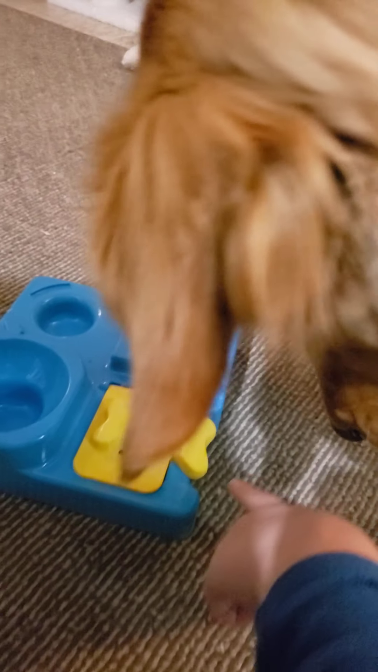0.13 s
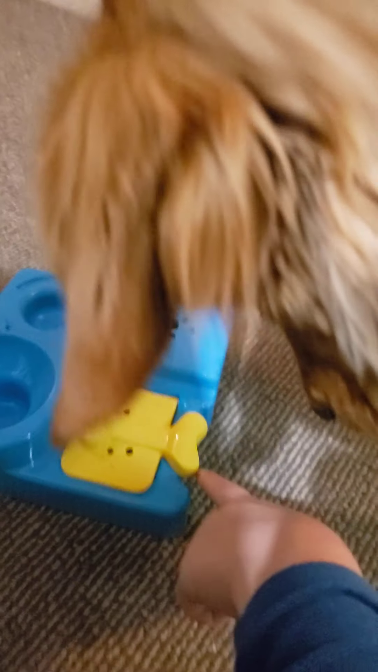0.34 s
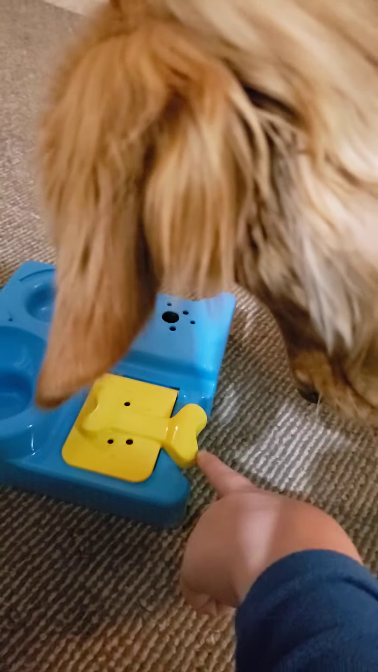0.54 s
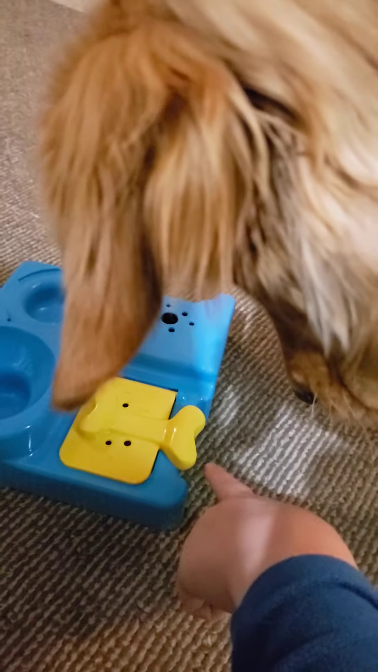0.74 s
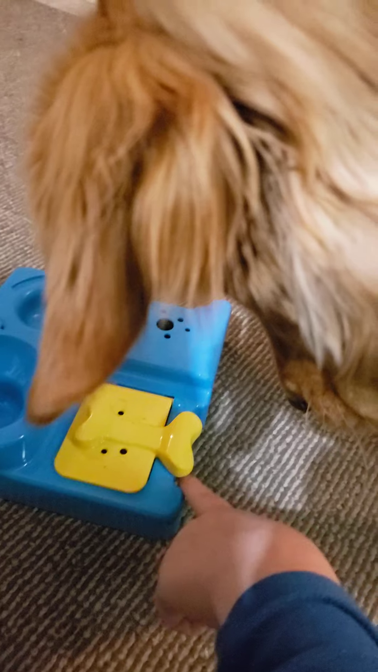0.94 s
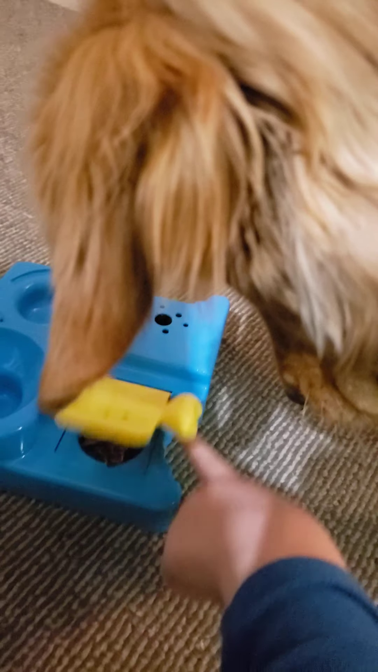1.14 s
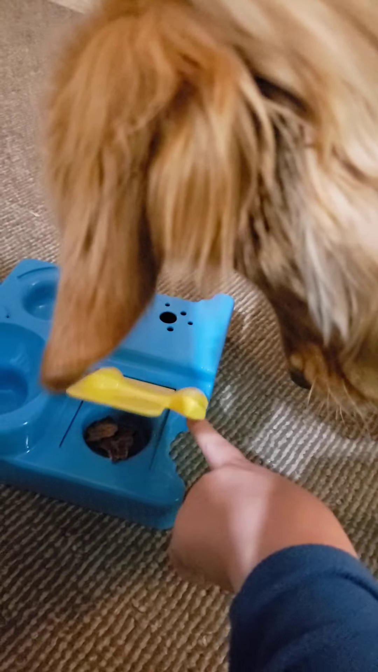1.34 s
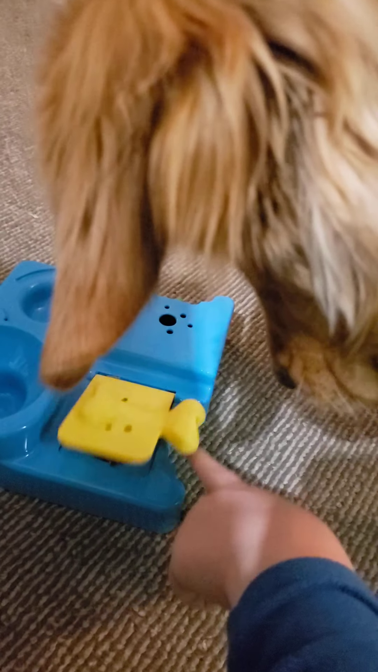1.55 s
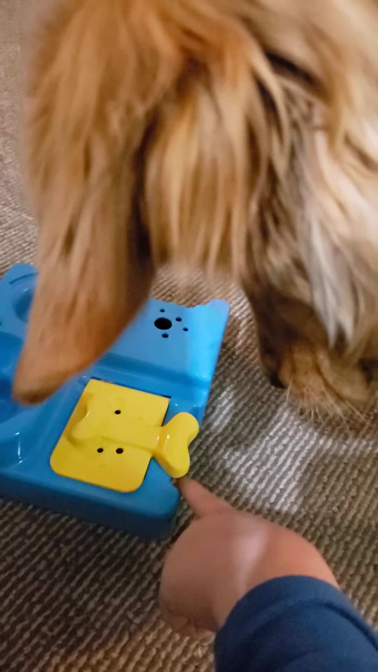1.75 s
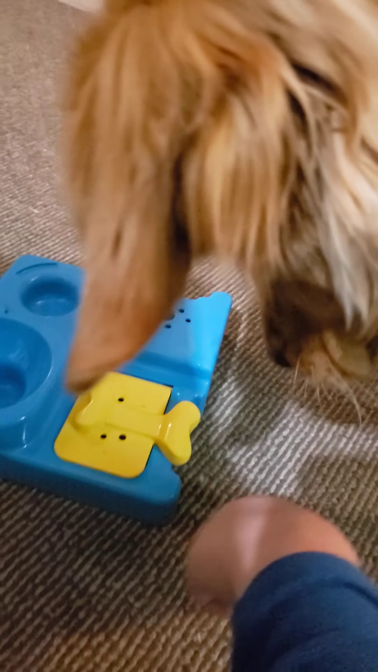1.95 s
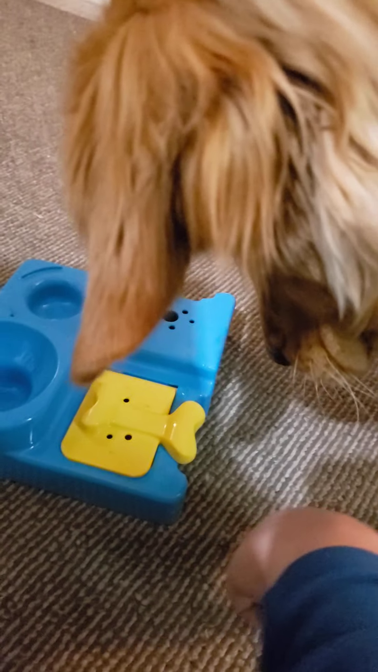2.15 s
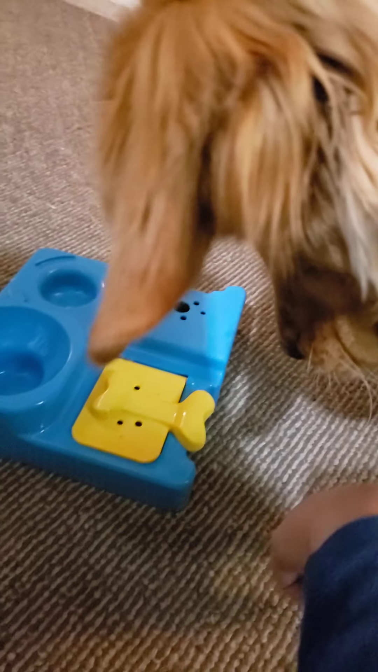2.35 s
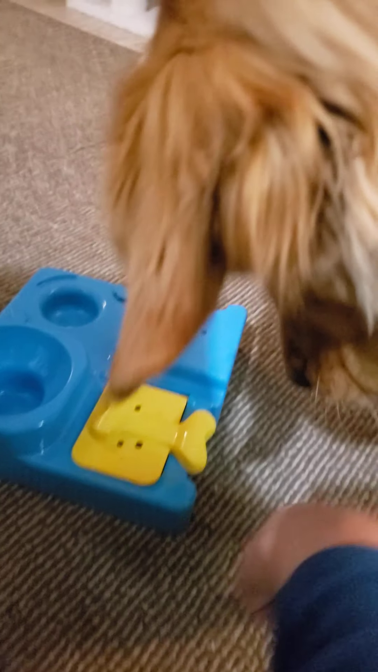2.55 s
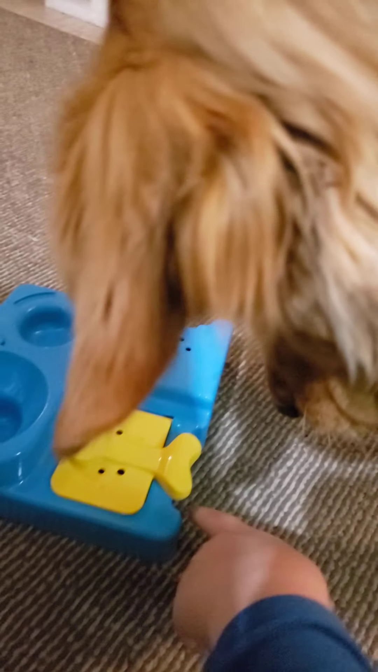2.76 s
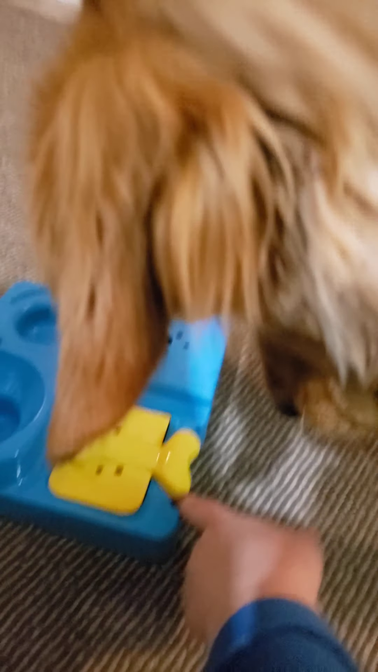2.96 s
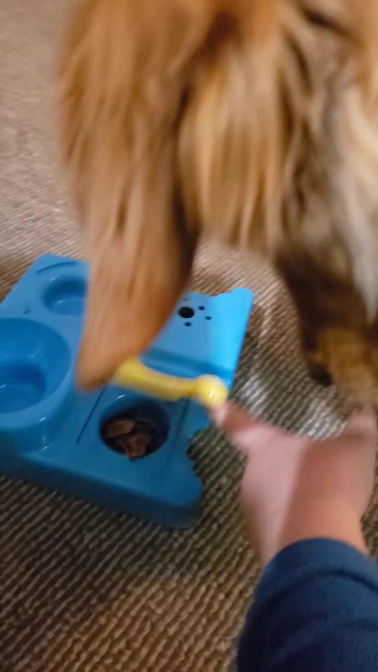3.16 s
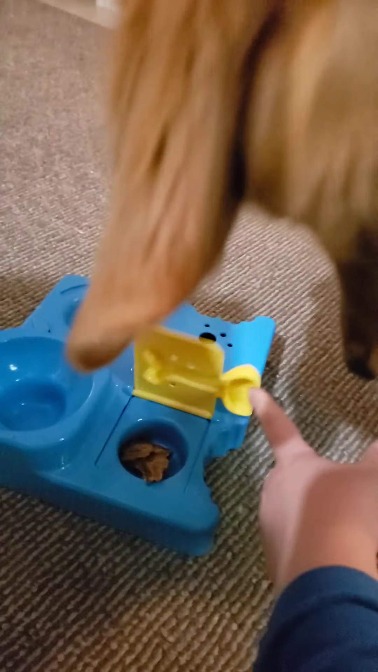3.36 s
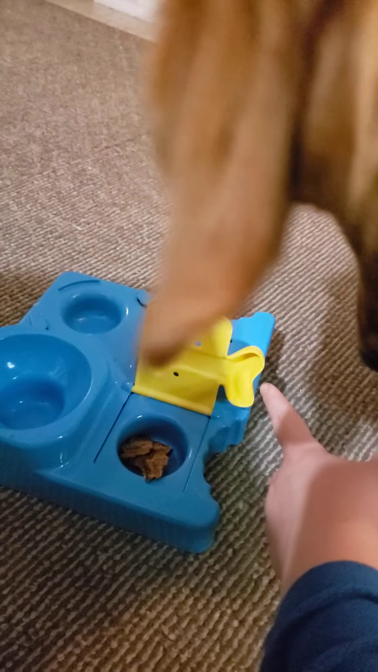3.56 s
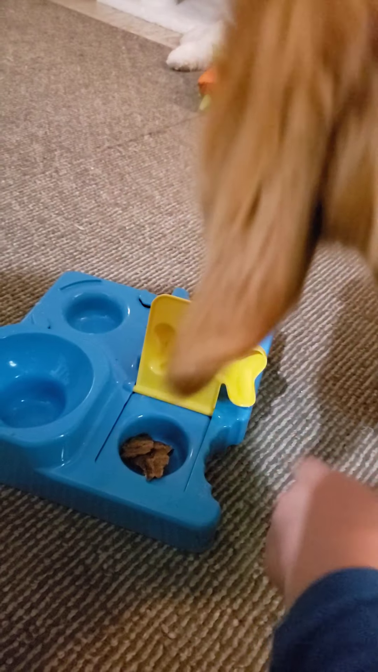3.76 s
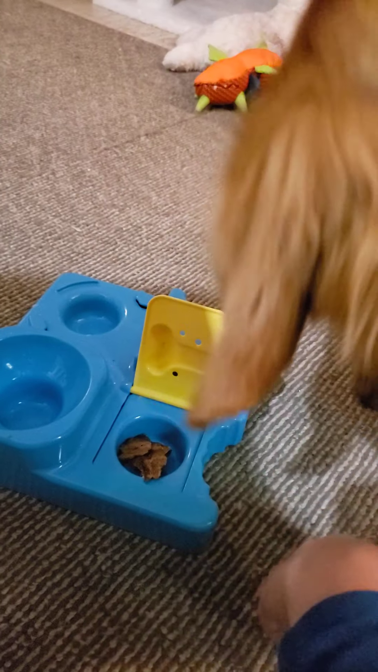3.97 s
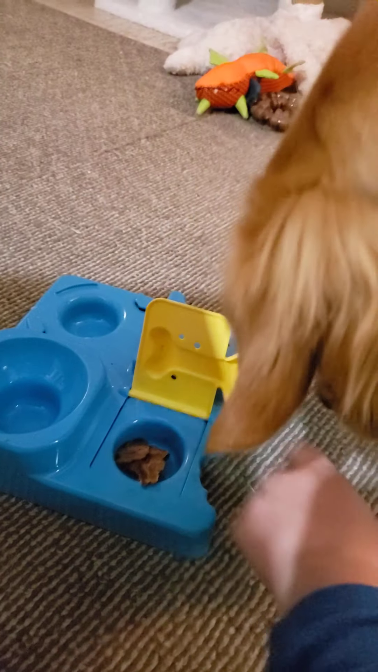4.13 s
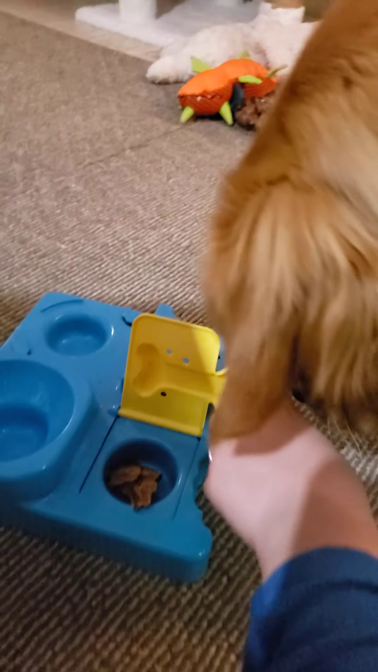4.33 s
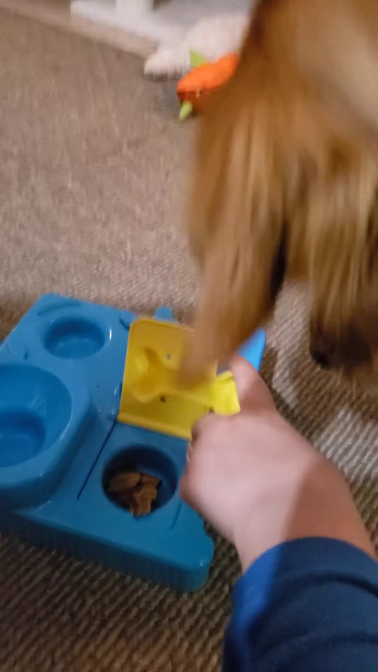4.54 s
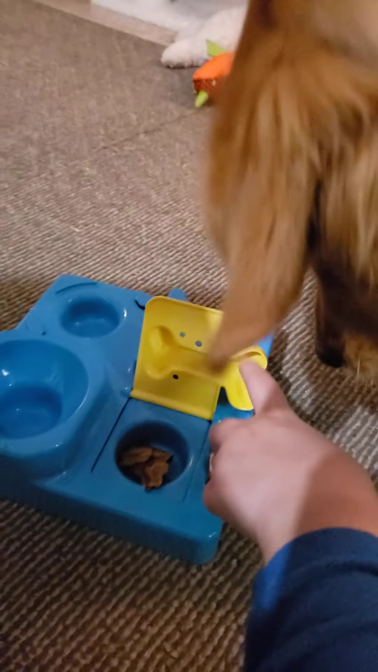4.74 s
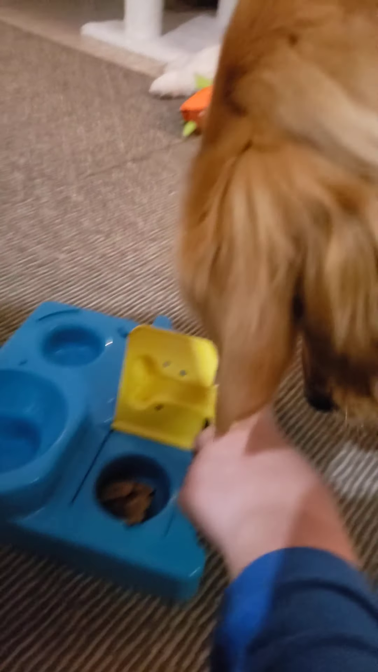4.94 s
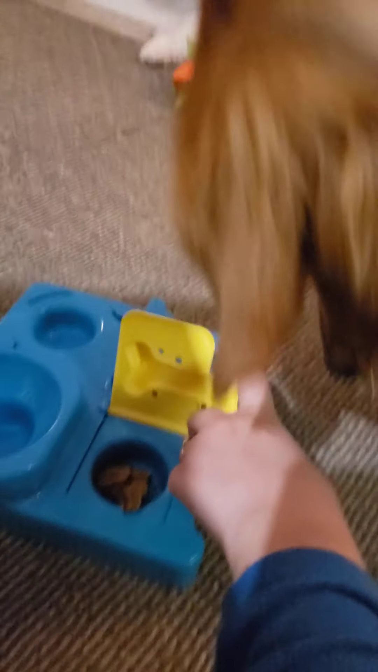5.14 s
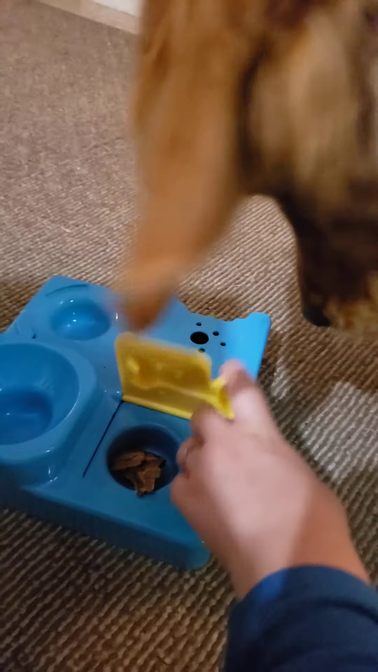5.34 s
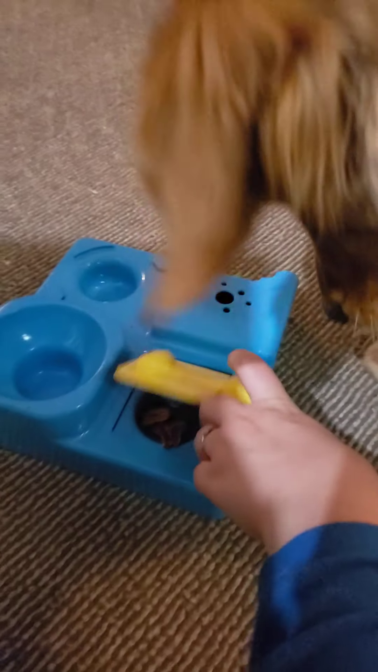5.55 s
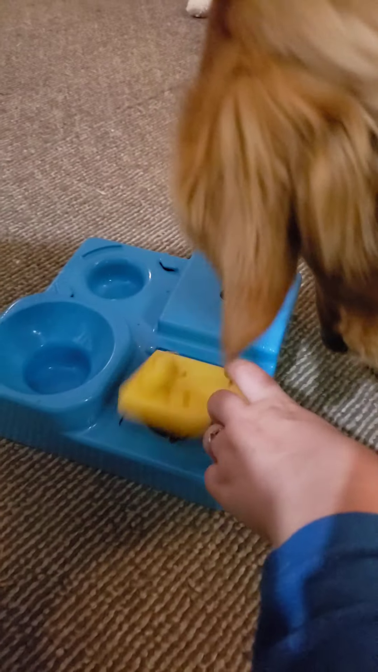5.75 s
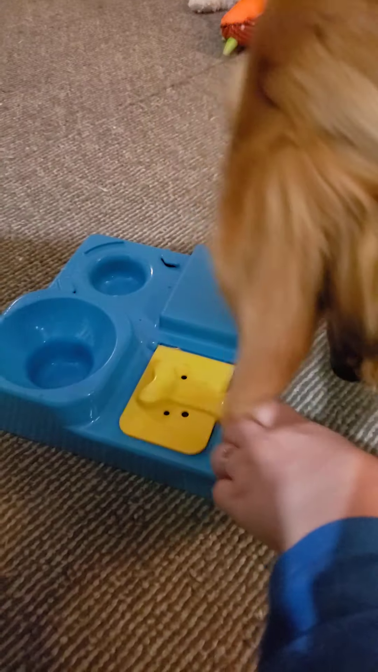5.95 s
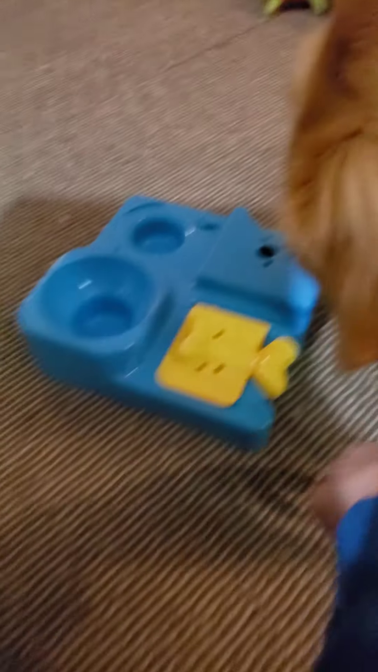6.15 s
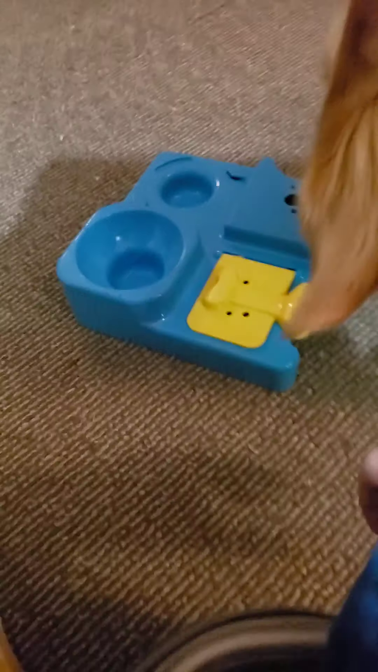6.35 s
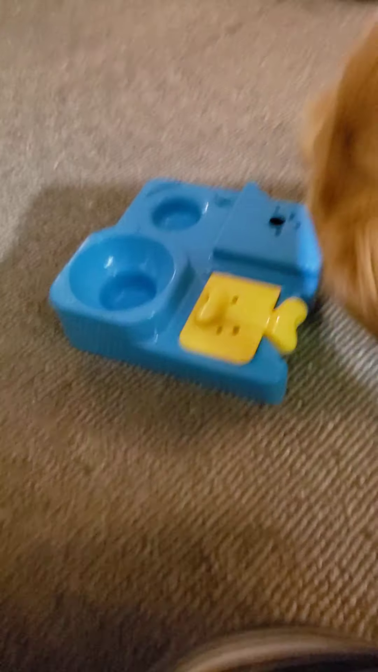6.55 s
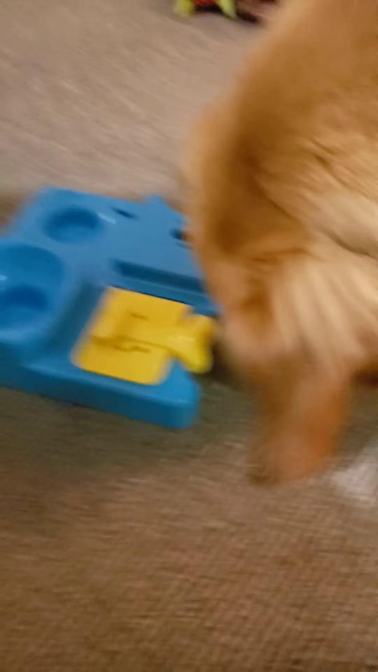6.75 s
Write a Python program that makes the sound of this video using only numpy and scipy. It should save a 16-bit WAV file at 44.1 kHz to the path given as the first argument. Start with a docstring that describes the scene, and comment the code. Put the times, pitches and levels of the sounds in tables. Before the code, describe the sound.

A hollow plastic puzzle feeder on carpet is handled close to a stereo microphone. Light taps and a small double clack come first, then a pause, then a brighter rattling burst as the flap is flipped open. Cloth brushes near the right side. The flap lifts again and slams shut with the loudest clack, followed by only rustling sleeve over a faint appliance hum.

```python
"""A hollow plastic feeder on a carpet: a hinged flap is tapped, lifted and dropped, and knocks ring the shell.
Each knock sums decaying modes and a crack of noise; fingers ring the same modes with small grains.
A sleeve, made of filtered noise, brushes close to the right microphone port.
An appliance motor hums as a set of wavering tones in the noise of the quiet room, which echoes the feeder."""
import sys
import numpy as np
from scipy import signal
from scipy.fft import rfft, irfft
from scipy.io import wavfile
from scipy.ndimage import uniform_filter1d

SR = 44100
rng = np.random.default_rng(int(sys.argv[2]) if len(sys.argv) > 2 else 0)


def ratio_of_db(decibels):
    """Turn decibels (scalar or array-like) into linear amplitude factors; 0 dB maps to 1."""
    return 10 ** (np.asarray(decibels, float) / 20)


def unload_wav(signal):
    """Save mono or channel-first audio to the path in sys.argv[1] as 16-bit WAV at rate SR, clipped to [-1, 1]."""
    wavfile.write(
        sys.argv[1],
        SR,
        np.round(np.clip(np.atleast_2d(signal).T, -1, 1) * 32767).astype(np.int16),
    )


N = 304290  # length in samples

# Modes of the plastic feeder, shell below and flap above SHELL_TOP_HZ.
# Each row: frequency in Hz, relative level in dB, t60 in seconds before the cap that keeps it short.
FEEDER_MODES = [(194, -19.5, 0.083), (267.5, -7, 0.11), (326, -14.5, 0.064), (375, -4, 0.05),
                (411.7, 2, 0.058), (472, 2, .07), (501.7, 2, 0.052), (569.6, 3.5, 0.091), (595, -5.5, .08),
                (632, -1.5, 0.076), (721.5, -2.5, 0.14), (795, -7, 0.072), (857.5, -12, 0.061),
                (963.1, -18, 0.034), (1201, -0.5, 0.079), (1300, 3, 0.11), (1451.5, -2.5, 0.021),
                (1589, -4.5, 0.016), (1820, -2, 0.019), (1900, -3, 0.09), (2204, -7.5, 0.015),
                (2293, -4, 0.021), (2435, -8.5, 0.021), (2675, 0, 0.015), (3093, -9, 0.067)]
SHELL_TOP_HZ = 1000


def evened(x):
    """Scales to rms 1."""
    return x / np.sqrt(np.mean(x ** 2) + 1e-20)


def read(points, hz):
    """Reads a table on a log-frequency axis."""
    f, value = np.transpose(points)
    return np.interp(np.log(hz + 1), np.log(f + 1), value)


def add(mix, s, sound):
    """Mixes a sound in at a time in seconds."""
    part = mix[..., round(s * SR):][..., :sound.shape[-1]]
    part += sound[..., :part.shape[-1]]


def coloured(x, points):
    """Filters by a spectrum table of Hz and dB."""
    gain = ratio_of_db(read(points, np.fft.rfftfreq(x.shape[-1], 1 / SR)))
    return irfft(rfft(x) * gain, x.shape[-1])


def wander(rate_hz, count):
    """Slow random drifts of rms 1, each a sum of twelve sines up to rate_hz."""
    f = np.geomspace(rate_hz / 10, rate_hz, 12)[:, None]
    t = np.arange(0, N + 256, 256) / SR
    phases = rng.random((count, 12, 1))
    slow = (np.sin(2 * np.pi * (f * t + phases)) / np.sqrt(f)).sum(1)
    return np.array([np.interp(np.arange(N) / SR, t, evened(row)) for row in slow])


def swell(peak_s, rise_s, fade_s, db):
    """Power of a gesture that swells to its peak and dies away."""
    edge_db = -20  # at the ends of the rise and the fade, relative to the peak
    squareness = 2.39  # a higher power holds the peak longer
    late = np.arange(N) / SR - peak_s
    way = abs(late / np.where(late < 0, rise_s, fade_s))
    return ratio_of_db(db + edge_db * way ** squareness) ** 2


def air():
    """Room tone: random short-time spectra with faint drifting patches."""
    # Colour of the room tone. Each row: frequency in Hz, relative level in dB.
    air_colour = [(15, -35), (25, -4), (53, -15), (116, -4.5), (210, -13.5), (424, -12.5), (526, -14.5),
                  (586, -14.5), (788, -23.5), (1500, -30.5), (2250, -22.5), (2720, -29.5), (3970, -28),
                  (8680, -40.5), (15700, -29.5)]
    # Likeness of the two ports. Each row: frequency in Hz, left-right correlation from -1 to 1.
    air_likeness = [(60, 0.53), (240, -0.29), (950, -0.27), (3770, -0.46), (15000, -0.098)]
    level_db, patchy_db = -68.5, -3.0
    frames, hz = N // 512 + 5, np.fft.rfftfreq(2048, 1 / SR)
    a, b, c, d, patches = rng.standard_normal((frames, 1025, 5)).T
    patches = evened(uniform_filter1d(uniform_filter1d(patches, 25, 0), 10, 1))
    same = read(air_likeness, hz)[:, None]
    left = a + 1j * b
    right = same * left + np.sqrt(1 - same ** 2) * (c + 1j * d)
    z = np.array([left, right]) * ratio_of_db(read(air_colour, hz)[:, None] + patchy_db * patches)
    noise = signal.istft(z, nperseg=2048, noverlap=1536)[1][:, :N]
    return ratio_of_db(level_db) * evened(noise) * ratio_of_db([[-.7], [.7]])


def motor():
    """Tones at sums of shaft turns and mains cycles; the high slot whine swells and fades."""
    # Orders of the motor tones. Each row: multiple of the shaft rate, multiple of the mains rate.
    orders = [(1, 0), (0, 2), (1, 1), (3, 0), (0, 3), (0, 4), (0, 5), (5, 0), (0, 6), (7, 0), (0, 8),
              (9, 0), (10, 0), (0, 11), (0, 12), (37, 0), (38, 0), (39, 0)]
    # Strength of those tones, the ones above 1 kHz relative to the whine.
    # Each row: level in dB, left minus right in dB.
    hum = [(-64.5, 1.5), (-68, -4), (-82, 10.5), (-77.5, 2), (-89.5, 6.5), (-84.5, -5), (-83, -2.5),
           (-80.5, -1.5), (-82, -8.5), (-85.5, 5.5), (-77.5, -7), (-75, -8), (-88.5, 4), (-91, -1),
           (-90, -8.5), (-11.5, 3), (-1, -6), (-8.5, -3.5)]
    # Two low tones off the shaft and mains multiples. Each row: frequency in Hz, level in dB.
    drones = [(53.1, -75), (107, -71.5)]
    # Course of the three high tones. Each row: time in seconds, level in dB.
    whine = [(0, -107), (1.2, -91), (2.2, -92), (3.2, -86), (3.9, -92), (4.5, -79.5), (5.4, -77.5),
             (6, -93), (6.9, -86)]
    shaft_hz, mains_hz, waver_db = 58.84, 60.0, -0.95
    t, out = np.arange(N) / SR, np.zeros((2, N))
    tones = [(a * shaft_hz + b * mains_hz, *level) for (a, b), level in zip(orders, hum)]
    tones += [(*drone, 0) for drone in drones]
    whine_db = np.interp(t, *np.transpose(whine))
    count = len(tones)
    drifts, slips, phases = wander(0.71, count), wander(11, count), rng.random(count)
    for (hz, db, pan_db), drift, slip, phase in zip(tones, drifts, slips, phases):
        level = ratio_of_db(db + waver_db * drift + (hz > SHELL_TOP_HZ) * whine_db)
        cycles = hz * t + phase + hz / 9000 * slip  # higher tones waver more in pitch
        tone = level * np.sin(2 * np.pi * cycles)
        out += np.sqrt(2) * tone * ratio_of_db([[pan_db / 2], [-pan_db / 2]])
    return out


def sleeve():
    """Cloth drags over cloth: a dense grainy rub and a finer hiss, nearer the right port."""
    # Sleeve strokes at the right port, before a light or hissy one is thinned.
    # Each row: peak in seconds, rise in seconds, fade in seconds, rub level in dB, hiss over the rub in dB.
    sleeve_strokes = [(0.24, 0.24, 0.16, -61, -10), (2.74, .08, 0.33, -59, -12.5),
                      (3.349, 0.74, .4, -76.5, -4), (4.31, .14, 0.3, -53, -7), (4.988, 0.069, .13, -52, -7),
                      (5.38, 0.14, 0.25, -63, -12.5), (6.1, .3, 0.275, -64.5, -11),
                      (6.411, 0.23, .3, -50.5, 0.5), (6.84, 0.19, 0.36, -55.5, 1)]
    # Colour of the cloth. Each row: frequency in Hz, relative level in dB.
    cloth_colour = [(44, -38), (75, 0.5), (90, -2), (123, 1.5), (147, -4), (263, -7.5), (359, -7.5),
                    (842, -12.5), (2580, -10.5), (4930, -10.5), (7720, -17), (9660, -27.5), (12100, -18.5),
                    (15800, -24.5)]
    # Fibres that snag. Each row: start in seconds, level in dB (right port 3.5 over it, left 11.5 under).
    snags = [(0.0892, -53.5), (0.1191, -54.5), (4.2844, -67.5), (4.34, -38.5), (4.8075, -56.5),
             (5.3666, -49), (5.3722, -50), (6.622, -50)]
    split_hz, grain_db, patchy_db = 9000, 0.5, 0.7
    lag, same = 21, 0.35  # samples later at the left port, likeness of the ports
    pan_per_db, even_at_db = -0.6223, -81  # a louder stroke is nearer the right port
    body_hz, body_per_db, full_at_db = 1700, 0.46, -53.5  # a light stroke loses its low rub
    mids_hz, thinning = (700, 3360), 0.4  # a hissy stroke skims the cloth and loses its middle

    grains = ratio_of_db(grain_db * evened(uniform_filter1d(rng.standard_normal(N), 90)))
    near, other = rng.standard_normal((2, N)) * grains
    far = same * np.roll(near, lag) + np.sqrt(1 - same ** 2) * other
    cloth = coloured(np.array([far, near]), cloth_colour)
    rub = signal.sosfiltfilt(signal.butter(4, split_hz, fs=SR, output="sos"), cloth)
    hiss = evened(cloth - rub)
    # the rub level is that of its upper part
    brush = signal.sosfilt(signal.butter(2, split_hz / 4, "high", fs=SR, output="sos"), rub)
    rub = rub / brush.std()

    patches = ratio_of_db(patchy_db * wander(40, count=2))
    strokes = np.array([swell(*row[:4]) for row in sleeve_strokes])
    rub_power = strokes.sum(0) + 1e-20
    hiss_power = ratio_of_db(np.array(sleeve_strokes)[:, 4]) ** 2 @ strokes
    rub_db = 10 * np.log10(rub_power)
    pan_db = pan_per_db * np.maximum(rub_db - even_at_db, 0)
    body = signal.sosfiltfilt(signal.butter(2, body_hz, fs=SR, output="sos"), rub)
    rub = rub - body * (1 - ratio_of_db(body_per_db * np.minimum(rub_db - full_at_db, 0)))
    mids = signal.sosfiltfilt(signal.butter(2, mids_hz, "band", fs=SR, output="sos"), rub)
    rub = rub - mids * np.clip(thinning * hiss_power / rub_power, 0, .9)
    out = np.sqrt(rub_power) * rub * patches[0] + np.sqrt(hiss_power) * hiss * patches[1]
    out *= ratio_of_db([pan_db, 0 * pan_db])

    for (s, db), tick in zip(snags, rng.standard_normal((len(snags), 200))):
        tick = signal.lfilter([1, -.8], 1, tick * np.exp(-np.arange(200) / 40))
        add(out, s, ratio_of_db([[db - 11.5], [db + 3.5]]) * tick / abs(tick).max())
    return out


def knock(flap_db, boom_db, crack_db, part_hz, bright_db, chance):
    """A short chatter of contacts rings the modes; each blow lands elsewhere and weights them anew."""
    # Colour of the dense upper modes. Each row: frequency in Hz, relative level in dB.
    crack_colour = [(530, -46.5), (900, -16.5), (1080, -15), (1320, -3.5), (1510, -16.5), (1870, -2.5),
                    (2650, -9), (2850, -4.5), (3750, -6), (4280, -4), (6060, -8.5), (7510, -16),
                    (10900, -29.5), (14900, -26), (15800, -46)]
    # Lean of the feeder between the ports. Each row: frequency in Hz, left minus right in dB.
    feeder_pan = [(60, -5), (110, -4.5), (200, -10.5), (380, 0.5), (700, -3.5), (1290, -2.5), (2380, -3),
                  (4400, 0), (8120, 8), (15000, 4.5)]
    scatter_db, chatter_ms = 2.5, 2.498
    snap_ms, fizz_db, fizz_t60 = 4.2, -12, 0.24  # fizz_t60 in seconds
    hz, db, t60 = np.array(FEEDER_MODES).T[:, :, None]
    t = np.arange(6000) / SR
    weight, detune = chance[:len(hz), None], chance[30:30 + len(hz), None]
    hits, noise = chance[60:64], chance[70:]

    flap = hz > SHELL_TOP_HZ
    reach = 0.26 * ratio_of_db(0.55 * (flap_db + 25))  # octaves: a harder blow shakes more of the flap
    away_db = np.minimum(3 * (np.log2(hz / part_hz) / reach) ** 2, 10)
    db = db + scatter_db * weight - flap * away_db
    t60 = np.minimum(t60, np.where(flap, .025, .05))  # every mode is kept short, the flap's shortest
    train = np.zeros(600)  # one blow, then weaker touches
    delays = np.minimum(abs(hits) * chatter_ms * SR / 1000, 599).astype(int)
    delays[0] = 0
    np.add.at(train, delays, 0.52 ** np.arange(4))

    # each mode reaches the two ports from another side
    turn = np.pi * np.tanh(hz / 2500) ** 2 * np.sin(hz / 370)
    side = np.array([1, -1])[:, None, None]
    shift = 1 + 0.026 * detune  # each blow detunes the modes a little at random
    swing = np.sin(2 * np.pi * hz * shift * t + side * turn / 2)
    decay = ratio_of_db(db - 60 * t / t60 + side * read(feeder_pan, hz) / 2)
    rings = decay * swing * (1 - np.exp(-t * hz * 0.32))
    ring = signal.fftconvolve(rings[:, flap[:, 0]].sum(1), train[None], axes=1)[:, :6000]
    boom = signal.fftconvolve(rings[:, ~flap[:, 0]].sum(1), train[None], axes=1)[:, :6000]

    # the upper modes lie too close to part: noise that snaps, then fizzes out
    colour = [(f, level + bright_db * max(np.log2(f / 4000), 0)) for f, level in crack_colour]
    left = coloured(noise[:6000], colour)
    # the right port hears it a quarter turn apart, with noise of its own
    right = signal.hilbert(left).imag + 0.84 * coloured(noise[6000:], colour)
    right = coloured(right, [(f, -pan_db) for f, pan_db in feeder_pan])
    crack = np.array([left, right]) * (np.exp(-t * 1000 / snap_ms) + ratio_of_db(fizz_db - 60 * t / fizz_t60))
    crack *= (1 - np.exp(-t * 1500)) * np.cos(np.pi / 2 * t / t[-1])
    layers = (flap_db, ring), (boom_db, boom), (crack_db, crack)
    return sum(ratio_of_db(level) * part / abs(part).max() for level, part in layers)


def feeder():
    """Blows on flap and shell, each ringing the plastic afresh."""
    # Each row: time in seconds, peak of the flap ring in dB, of the shell boom in dB, of the crack in dB,
    # struck part of the flap in Hz.
    knocks = [(0.356, -35.5, -32.5, -43, 2074), (0.932, -43, -49, -48.5, 2200),
              (0.9438, -40.5, -36.5, -56, 1400), (0.9539, -40.5, -44, -45, 1900),
              (1.062, -63, -60, -53, 2400), (1.074, -30.5, -27, -44, 1710), (1.1621, -36, -36, -36.5, 1710),
              (1.1714, -39, -35.5, -61, 1900), (1.2695, -52.5, -54.5, -62, 1900),
              (1.5784, -51, -62, -58.5, 2310), (1.7938, -48, -38.5, -24.5, 1400),
              (1.8057, -27, -29.5, -36, 1300), (1.8193, -25.5, -32, -40, 2310),
              (2.969, -37.5, -33.5, -46, 1900), (3.049, -37.5, -45.5, -46.5, 1900),
              (3.0807, -40, -37, -62, 1900), (3.2389, -36.5, -41.5, -38, 2220),
              (3.4097, -40, -43, -28.5, 1980), (3.5690, -18, -22, -18.5, 1820),
              (3.5771, -17.5, -49, -23.5, 2420), (3.5928, -34, -30.5, -51, 1300),
              (3.6818, -14.5, -39, -21, 2720), (3.685, -18.5, -21, -43, 1820),
              (3.7378, -22.5, -34.5, -31.5, 2644), (3.7584, -41, -51, -68, 1240),
              (4.6765, -27, -35.5, -35.5, 1820), (4.725, -49, -54, -43, 1900),
              (5.3463, -55, -52, -67, 2180), (5.4674, -49, -38.5, -72, 1240),
              (5.4784, -37, -30.5, -49, 1900), (5.537, -26.5, -25, -26, 1830), (5.546, -26, -25, -33, 1260),
              (5.5595, -25, -29.5, -59, 2096), (5.666, -36, -43.5, -44, 1810),
              (5.833, -55, -43.5, -73, 1910), (5.872, -2.5, -12.5, -6, 2200)]
    # Brightness of the crack above 4 kHz, by stretch of time.
    # Each row: end of the stretch in seconds, tilt in dB per octave.
    brightness = [(2.0, 6.5), (3.0, 5), (3.2, -10), (3.575, 0), (5.5, -4.5), (5.55, -1.5), (5.85, -6),
                  (6.9, 9)]
    out, chance = np.zeros((2, N)), rng.standard_normal((len(knocks), 12070))
    until, bright_db = np.transpose(brightness)
    for (s, *blow), row in zip(knocks, chance):
        stretch = min(np.searchsorted(until, s), len(brightness) - 1)
        add(out, s - .001, knock(*blow, bright_db[stretch], row))  # starts 1 ms ahead
    return out


def room(x):
    """Sparse reflections of random sign, each band dying at its own speed; bass alike at both ports."""
    # Decay of the room. Each row: frequency in Hz, t60 in seconds.
    room_decay = [(250, 0.14), (600, 0.19), (1500, 0.2), (4000, 0.12), (9000, 0.049), (15000, 0.087)]
    taps = np.zeros((3, 2, SR // 2))
    at = np.arange(120, SR // 2 - 20, 20) + rng.integers(0, 20, (3, 2, (SR // 2 - 121) // 20))
    np.put_along_axis(taps, at, rng.choice([-1., 1.], at.shape), 2)
    hz, t, z = signal.stft(taps, SR, nperseg=256)
    same = np.exp(-(hz[:, None] / 1100) ** 2)
    z[:, 1] = same * z[:, 0] + np.sqrt(1 - same ** 2) * z[:, 1]
    z = z * ratio_of_db(-60 * t / read(room_decay, hz)[:, None])
    tails = signal.istft(z, SR, nperseg=256)[1]
    tails /= np.linalg.norm(tails[:, :1], axis=2, keepdims=True)
    # the blend of three tails keeps turning, so that the echo varies from knock to knock
    turn = np.arange(N) / SR * 9
    feeds = np.sqrt(2 / 3) * np.cos(turn + np.pi / 3 * np.arange(3)[:, None])
    return signal.fftconvolve(x.mean(0) * feeds[:, None], tails, axes=2).sum(0)[:, :N]


def finger():
    """Skin slips on the feeder in small uneven grains that ring the same modes softly."""
    # A finger shifts on the feeder. Each row: peak in seconds, length in seconds, level in dB.
    shifts = [(0.484, 0.12, -60.5), (1.068, 0.054, -54.5), (1.228, 0.2, -63), (1.609, 0.14, -65),
              (3.244, 0.95, -68.5), (5.271, 0.13, -66.5), (5.372, .15, -62), (5.525, .2, -46),
              (5.747, 0.15, -63), (5.861, 0.042, -42.5)]
    grains_per_s, grain_db, flap_db = 900, 4, -14
    rise = .35  # share of the length
    hz, db, t60 = np.array(FEEDER_MODES).T[:, :, None]
    t = np.arange(3000) / SR
    decay = ratio_of_db(db + flap_db * (hz > SHELL_TOP_HZ) - 60 * t / np.minimum(t60, .05))
    body = (decay * np.sin(2 * np.pi * hz * t)).sum(0)
    grains = (rng.random(N) < grains_per_s / SR) * rng.standard_normal(N)
    grains = grains * ratio_of_db(grain_db * rng.exponential(1, N).clip(0, 4))
    power = sum(swell(s, rise * long, (1 - rise) * long, level) for s, long, level in shifts)
    slips = evened(grains) * np.sqrt(power)
    return signal.oaconvolve(slips, body / np.linalg.norm(body))[:N] * ratio_of_db([[-.7], [.7]])


def scene():
    """Feeder in its room, sleeve, room tone and motor."""
    plastic = feeder() + finger()
    return plastic + ratio_of_db(-6) * room(plastic) + sleeve() + air() + motor()


def low_pass(x):
    """Removes everything above the highest recorded frequency."""
    return signal.sosfilt(signal.butter(12, 16660, fs=SR, output="sos"), x)


def record(dry):
    """The microphone drops the top treble and the deepest bass."""
    dulled = signal.sosfilt(signal.butter(10, 16300, fs=SR, output="sos"), dry)
    mix = signal.sosfilt(signal.butter(2, 38, "high", fs=SR, output="sos"), dulled)
    return low_pass(mix)


dry = scene()
out = record(dry)
unload_wav(out)
```